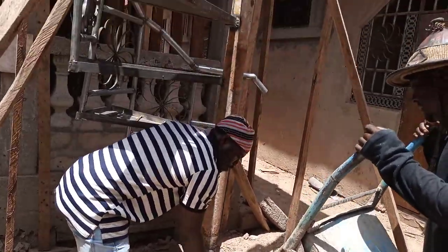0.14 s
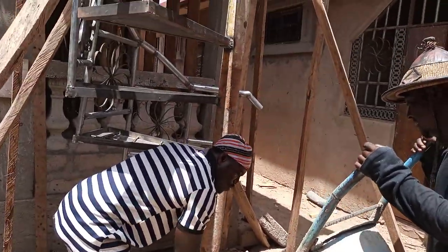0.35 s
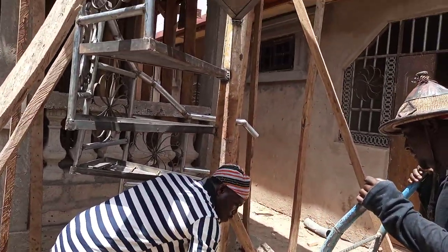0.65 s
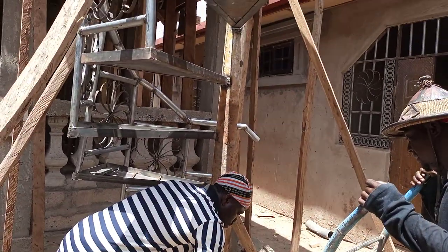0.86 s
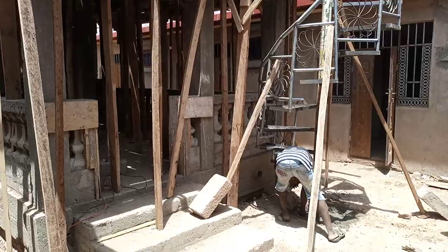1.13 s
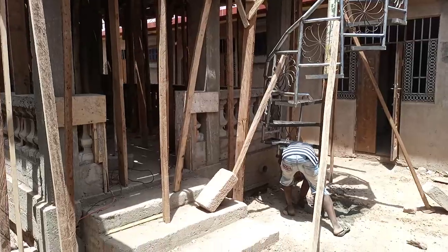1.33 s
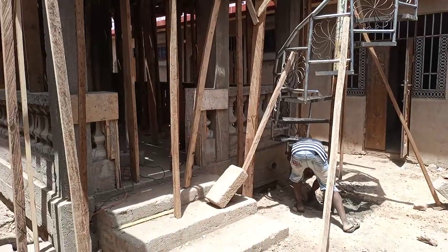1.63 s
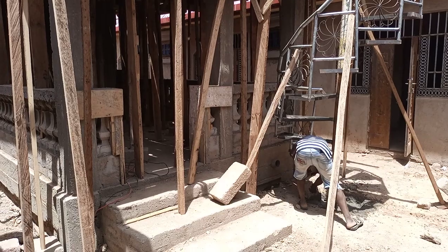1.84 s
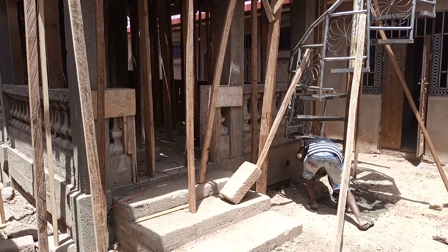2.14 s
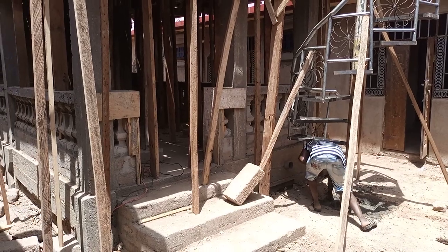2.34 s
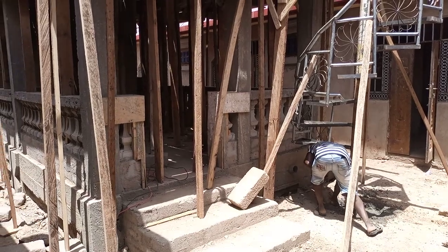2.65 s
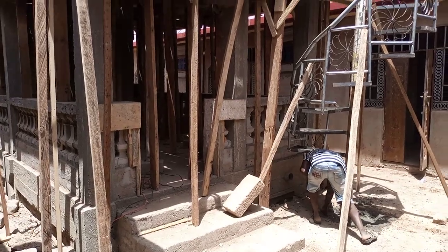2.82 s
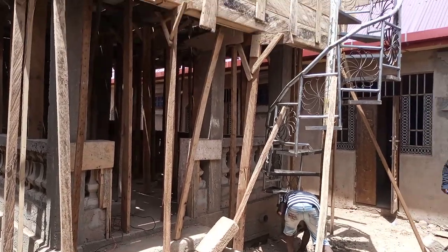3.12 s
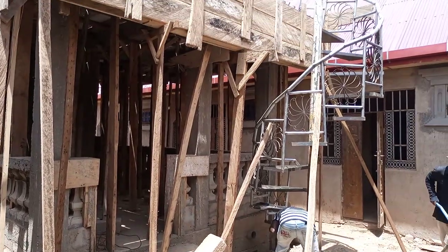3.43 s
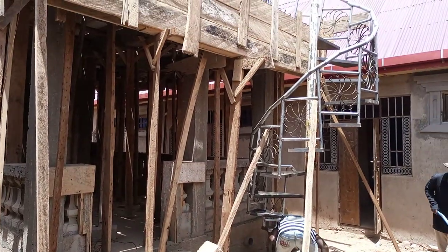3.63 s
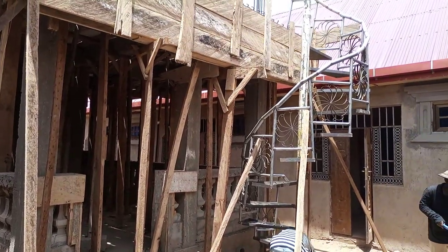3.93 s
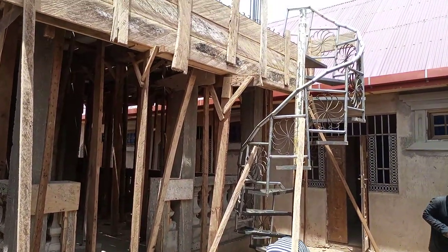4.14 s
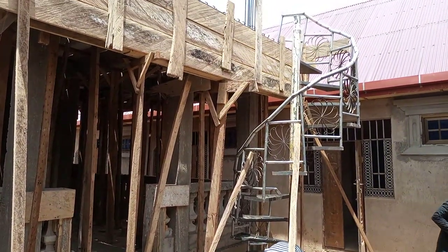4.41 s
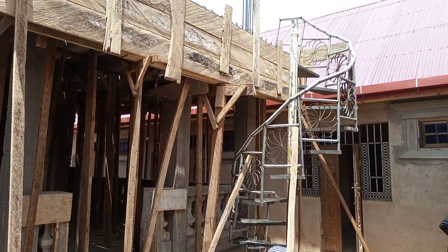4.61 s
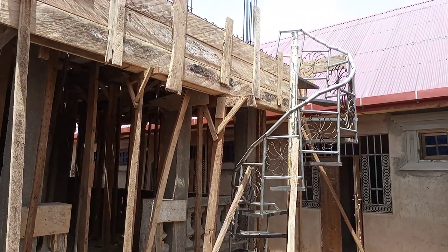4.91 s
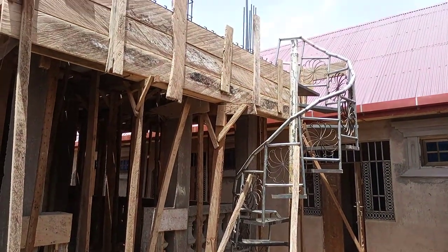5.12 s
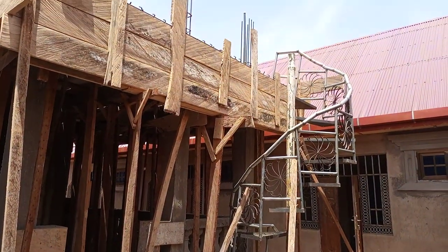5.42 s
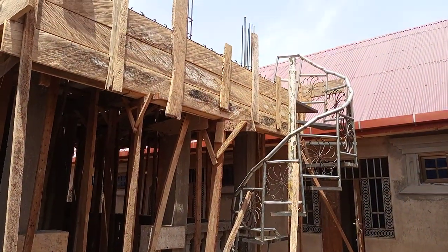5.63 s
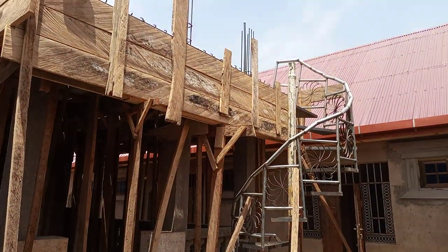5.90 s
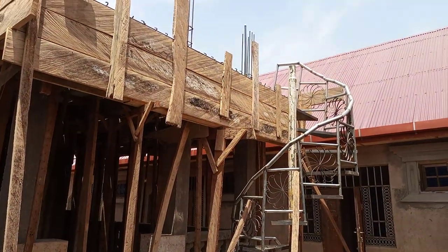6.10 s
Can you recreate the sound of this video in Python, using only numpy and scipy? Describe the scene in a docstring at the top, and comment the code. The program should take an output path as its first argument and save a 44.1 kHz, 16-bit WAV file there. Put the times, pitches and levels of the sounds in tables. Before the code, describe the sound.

A steel shovel scrapes gritty wet concrete from a drumming wheelbarrow close by, drops out briefly, then continues far quieter across a humming yard.

```python
"""On a building site, a steel shovel scrapes wet concrete out of a wheelbarrow tray, first close by.
Gravel grinding under the blade is stone-laden noise shaped into slurry, grit and fizz; the blade rings
in decaying modes when it bites, and noise-driven resonances make the tray drum. After a short dropout
it cuts to across the yard, where a low machine hum wavers over a rumble and soft low throbs swell.
Stones snap, the edge squeals in stacked overtones, and the load groans in sliding narrow bands."""
import sys
import numpy as np
from scipy import signal
from scipy.fft import rfft, irfft, next_fast_len
from scipy.io import wavfile
from scipy.ndimage import uniform_filter1d, map_coordinates

SR = 44100
rng = np.random.default_rng(int(sys.argv[2]) if len(sys.argv) > 2 else 0)


def store_pcm(level_fs):
    """Save levels as 16-bit WAV."""
    pcm = np.round(np.clip(level_fs, -1, 1) * 32767).astype(np.int16)
    wavfile.write(sys.argv[1], SR, np.atleast_2d(pcm).T)


N = 276066
CUT_S = 1.0688  # close before this moment, far after it

# Ringing modes of the steel blade: frequency_hz, level_db (relative), t60_s
BLADE_MODES = [(824, 5, 0.13), (1313, 11, 0.072), (1770, -6, 0.048), (2310, 0, 0.18), (3160, -5, 0.12),
               (3658, 4, 0.15), (4900, -5.5, 0.12), (5540, -3.5, 0.1), (6490, 0, 0.16)]
# Treble colour on the fizz, bites and snaps, a peak near 15 kHz, then a steep drop: frequency_hz, gain_db
TREBLE_COLOUR = [(13600, 0), (14600, 13), (15200, 17), (15780, 17), (15950, -22), (16500, -24),
                 (16750, -45)]


def shovel():
    """Sliding friction radiates from the load; close by, the tray it excites radiates too."""
    close = np.arange(N) < CUT_S * SR
    grit_db, slurry_db, fizz_db = strokes()
    body = scrape(grit_db, slurry_db, fizz_db, steel=0.045)
    return body + close * drumming(grit_db)


def strokes():
    """Energy addition: overlapping strokes sum in power to a grit level, and slurry and fizz against it."""
    # Strokes of the blade through the load: start_s, grit_db, rise_s, hold_s, fade_db_per_s,
    # slurry_db and fizz_db (both relative to the grit)
    stroke_rows = [(0.0, -30.5, 0.0014, 0.08, 150, -10, -2.5), (0.083, -29, 0.039, 0.089, 300, -4, -5),
                   (0.242, -40.5, .005, 0.0092, 75, -1.5, -3), (0.423, -28, 0.0018, 0.1, 148.5, -4, -4.5),
                   (0.513, -26.5, 0.057, 0.049, 159.5, -4.5, -2), (0.772, -32, 0.0036, 0.051, 151, -4, 3.5),
                   (0.846, -27, 0.0064, 0.076, 154, -1.5, -2),
                   (1.035, -24, 0.0025, 0.036, 149.5, -4.5, -3.5),
                   (1.069, -45.5, 0.0034, 0.18, 34, -5.5, -0.5), (1.197, -44.5, 0.21, 0.045, 126, -3, -2),
                   (1.601, -53.5, 0.06, .05, 100, -7, -3), (1.696, -39, 0.018, 0.02, 141, -6, -1),
                   (1.89, -59.5, 0.047, 0.28, 106, -1.5, -9), (2.173, -53.5, .005, .02, 150, -6, -5),
                   (2.224, -46, 0.011, 0.052, 60, -5.5, -4.5), (2.323, -43.5, 0.058, 0.027, 45.5, -3, 4),
                   (2.5, -48, 0.043, 0.019, 83, -6, -4.5), (2.784, -33, .001, 0.013, 60, -4.5, -1),
                   (3.053, -45, .008, 0.064, 143, -8.5, 1.5),
                   (3.213, -36.5, 0.0061, 0.022, 132.5, -5.5, -0.5), (3.272, -49, .02, 0.031, 111, -9, 3.5),
                   (3.626, -57, 0.1, .02, 70, -2.5, -13.5), (3.84, -59, 0.037, 0.067, 80, -0.5, -13.5),
                   (3.984, -37.5, 0.0011, .02, 150, -21, -5.5), (4.008, -40, 0.032, 0.027, 42, -7.5, 4.5),
                   (4.094, -43.5, 0.085, 0.15, 35, -5, -3.5), (4.51, -49.5, .03, 0.045, 37, -2.5, 1),
                   (4.767, -43.5, 0.011, 0.018, 110, -7, -5), (4.853, -50, 0.065, 0.15, 54, -1.5, -0.5),
                   (5.045, -44.5, 0.061, 0.014, 107, -19, 2), (5.208, -48.5, 0.035, .05, 41, -2.5, -1.5),
                   (5.302, -46.5, .005, 0.02, 200, -5, -2), (5.382, -45.5, .005, 0.1, 158, -2.5, 4.5),
                   (5.568, -45, 0.0082, 0.011, 293, -4.5, 10), (5.715, -49, 0.041, .02, 97, 0.5, 4),
                   (5.766, -37.5, 0.058, 0.012, 152, -4, 4), (5.833, -41, 0.021, 0.02, 52, -3.5, 2.5),
                   (6.11, -35.5, .004, 0.022, 100, -6, -9), (6.179, -33.5, .03, 0.036, 150, -8, -1)]
    rest_db = -72.5  # grit trickling between strokes
    slurry_lag_s, slurry_fade, fizz_fade = 0.0071, 0.84, 1.48  # slurry lingers, fizz dies sooner
    grit_levels, slurry_levels, fizz_levels = [rest_db], [rest_db - 2.5], [rest_db - 19.5]
    for s, db, rise, hold, fade, wet_db, fine_db in stroke_rows:
        grit_levels.append(shape(s, db, rise, hold, fade))
        slurry_levels.append(shape(s, db + wet_db, rise + slurry_lag_s, hold, fade * slurry_fade))
        fizz_levels.append(shape(s, db + fine_db, rise, hold, fade * fizz_fade))
    grit = power_sum(grit_levels)
    return grit, power_sum(slurry_levels) - grit, power_sum(fizz_levels) - grit


def scrape(grit_db, slurry_db, fizz_db, steel):
    """Granular friction: low slurry, grit exciting the blade's modes and fine fizz share one judder."""
    # Relative spectra of the three parts of the load: frequency_hz, density_db
    grit_spectrum = [(900, -50), (1800, -1.5), (3000, -2), (6400, 1), (7500, -5), (9000, -15),
                     (11000, -43.5)]
    slurry_spectrum = [(200, -19.5), (400, -7), (640, -4.5), (1200, -6.5), (1900, -10.5), (3000, -50.5)]
    fizz_spectrum = [(6500, -38), (9000, 1), (11400, 0), (13500, -0.5), (17000, -4)]
    judder = amp(1.16 * wobble(30) + 0.6 * wobble(90))
    rub = gravel(1500, spread_db=2.5, share=0.45, patchy_db=2.5, size=512)
    singing = resonant([(hz, 6 / t60, db) for hz, db, t60 in BLADE_MODES])  # shorter ring, wider band
    bare_grit = unit(filtered(rub, colour(grit_spectrum)))
    grit = unit(bare_grit + steel * unit(filtered(rub, singing)))
    wet_load = gravel(600, spread_db=1.0, share=0.33, patchy_db=3.5, size=2048)
    slurry = unit(filtered(wet_load, colour(slurry_spectrum)))
    fizz_response = lambda hz: colour(fizz_spectrum)(hz) * colour(TREBLE_COLOUR)(hz)
    fizz = unit(amp(1.7 * wobble(22)) * filtered(rub, fizz_response))  # fine sand comes in spurts
    return amp(grit_db) * judder * (grit + amp(slurry_db) * slurry + amp(fizz_db) * fizz)


def gravel(rate, spread_db, share, patchy_db, size):
    """Shot noise: uneven stones at a mean rate per second in sand hiss, its colour shifting in patches."""
    chance = rng.random(N) < rate / SR
    stones = chance * rng.standard_normal(N) * amp(spread_db * rng.standard_normal(N))
    mixture = rng.standard_normal(N) + share * unit(stones)
    spectrum = signal.stft(mixture, nperseg=size)[2]
    field = rng.standard_normal(spectrum.shape)
    field = uniform_filter1d(field, size=3, axis=0)  # smooth over frequency
    field = uniform_filter1d(field, size=7, axis=1)  # smooth over time
    return signal.istft(spectrum * amp(patchy_db * unit(field)), nperseg=size)[1][:N]


def drumming(grit_db):
    """Forced resonance: gravelly knocks excite the tray's modes, each wavering in level at random."""
    # Modes of the tray: frequency_hz, width_hz, level_db (relative)
    tray_modes = [(200, 16, 1), (236, 18, -4), (285, 18, 7), (372, 18, 3), (410, 12, -4), (575, 24, -5),
                  (805, 24, -9)]
    # Moments when a close stroke digs in: start_s, level_db, hold_s
    dig_rows = [(0.0, -27, 0.059), (0.423, -29, 0.069), (0.773, -24.5, 0.019), (0.848, -23, 0.027)]
    rise_s, fade_db_per_s, under_grit_db = 0.0065, 167, -7
    levels = [grit_db + under_grit_db]
    levels += [shape(s, db, rise_s, hold, fade_db_per_s) for s, db, hold in dig_rows]
    knocks = gravel(470, spread_db=2.0, share=0.36, patchy_db=-0.5, size=1024)
    modes = sum(amp(2.5 * wobble(8.89)) * filtered(knocks, resonant([mode])) for mode in tray_modes)
    thin_sheet = lambda f: 1 / (1 + (140 / (f + 1)) ** 4)  # a small panel radiates no deep bass
    return amp(power_sum(levels)) * unit(filtered(modes, thin_sheet))


def bites():
    """Impact excitation: a bite rings the blade's modes and throws grit, brighter for a harder edge."""
    # Bites of the blade: start_s, level_db (before colouring), ring_db (relative),
    # brightness_db_per_octave (about 4 kHz)
    bite_rows = [(0.4235, -2, -21.5, -1.5), (0.847, -14.5, -17, 5), (2.2228, -29, -17, 6),
                 (2.365, -22, -14.5, 2.5), (2.78, -8, -16, 1), (2.8335, -19.5, -15, 5.5),
                 (3.0673, -26, -14, -1.5), (3.9799, -15.5, -17, 2), (4.0194, -21.5, -16, -1.5),
                 (4.0794, -22.5, -23, 6), (5.295, -22, -23, 0.5), (5.571, -26.5, -13, -1),
                 (5.7493, -24.5, -12, 3.5), (5.7677, -19.5, -17.5, -3), (5.8015, -13, -14.5, 1.5),
                 (6.1016, -17, -9, 1)]
    out, t = np.zeros(N + SR), np.arange(SR // 4) / SR
    octaves = np.log2(np.clip(np.fft.rfftfreq(len(t), 1 / SR), 400, 12000) / 4000)
    onset = 1 - np.exp(-t / 0.0017)
    for s, db, ring_db, bright_db in bite_rows:
        ring = 0
        for hz, level, t60 in BLADE_MODES:
            mode_db = level + bright_db * np.log2(hz / 4000) + rng.normal(0, 1.4)  # new strengths each bite
            ring = ring + amp(mode_db - 60 * t / t60) * np.sin(2 * np.pi * hz * t)
        grit = irfft(rfft(rng.standard_normal(len(t))) * amp(bright_db * octaves), len(t))
        puff = amp(-6 - 60 * t / 0.083) * grit
        out[round(s * SR):][:len(t)] += amp(db) * (amp(ring_db) * ring * onset + puff)
    return filtered(out[:N], colour([(300, -25.5), (3000, -11.0), (7000, -4.5), (13500, -17)]))


def snaps():
    """Brittle fracture: a cracking stone is a few milliseconds of decaying bright noise."""
    # Single stones snapping under the edge: start_s, level_db (before decay and colouring)
    snap_rows = [(0.0118, -5.5), (0.0897, -6.5), (0.5557, -7), (4.5171, -33), (4.641, -26.5), (5.3983, -27),
                 (5.4265, -21), (5.707, -34), (5.893, -16), (6.196, -12.5)]
    out, t = np.zeros(N + SR), np.arange(SR // 50) / SR
    for s, db in snap_rows:
        crack = unit(rng.standard_normal(len(t)))
        out[round(s * SR):][:len(t)] += amp(db - 3 - 60 * t / .014) * crack
    return filtered(out[:N], colour([(2000, -22.5), (5000, -3.0), (8000, -6), (13500, -14)]))


def squeals():
    """Stick-slip: regular slips give harmonic overtones, each stuttering as stones pass under the edge."""
    # Squeals of the edge slipping on steel: start_s, slip_rate_hz, level_db (before overtone gains), t60_s
    squeal_rows = [(2.781, 624, -34, .3), (6.103, 628, -32.5, .45)]
    # Strength of the overtones: frequency_hz, gain_db
    overtone_gains = [(600, -12), (1250, -2), (2500, -3.5), (3100, -12), (3770, 0), (4400, -17),
                      (5300, -16), (8000, -4)]
    out, t = np.zeros(N + SR), np.arange(SR // 3) / SR
    onset = 1 - np.exp(-t / 0.0075)
    for s, hz, db, t60 in squeal_rows:
        stack = 0
        for k in range(1, 13):
            stutter = amp(2.5 * wobble(70)[:len(t)])
            tone = np.sin(2 * np.pi * (k * hz * t + rng.random()))
            stack = stack + colour(overtone_gains)(k * hz) * stutter * tone
        out[round(s * SR):][:len(t)] += amp(db - 60 * t / t60) * onset * stack
    return out[:N]


def groans():
    """Narrow-band noise: random quadrature modulation of a carrier that slides as the load shifts."""
    # Groans of the load: start_s, length_s, from_hz, to_hz, level_db
    groan_rows = [(0.089, .14, 882, 1308, -34.5), (2.371, 0.24, 917, 683, -52),
                  (2.44, 0.097, 1490, 1380, -52), (3.65, 0.15, 1400, 1240, -68),
                  (6.171, 0.067, 463, 430, -39.5)]
    flutter = 85  # random knots per second
    out, t = 0, np.arange(N) / SR
    for s, length, from_hz, to_hz, db in groan_rows:
        progress = np.clip((t - s) / length, 0, 1)
        phase = 2 * np.pi * np.cumsum(from_hz + (to_hz - from_hz) * progress) / SR
        band = wobble(flutter) * np.sin(phase) + wobble(flutter) * np.cos(phase)
        swell = np.sqrt(np.abs(np.sin(np.pi * progress))) * (progress < 1)
        out = out + amp(db) * swell * band
    return out


def yard():
    """Random modulation: the far hum wavers in pitch and is fuzzy; lumpy noise rumbles near and far."""
    # Level of the hum: time_s, level_db
    hum_levels = [(1.09, -53), (1.15, -64.5), (1.45, -59), (1.66, -86), (1.72, -52.5), (2.28, -66.5),
                  (2.34, -53), (2.57, -65), (2.62, -58.5), (3.42, -74), (3.535, -67), (3.555, -57),
                  (3.6, -67), (3.64, -54), (4.2, -53), (4.3, -57), (4.88, -57), (5.02, -46), (5.21, -58),
                  (5.49, -50), (5.63, -61.5), (6.26, -54)]
    # Mean pitch of the hum: time_s, pitch_hz
    hum_pitches = [(3.65, 191.1), (3.78, 180.6), (4.0, 196.2), (4.3, 186.5), (5.0, 180), (5.5, 192.7)]
    # Relative spectrum of the rumble: frequency_hz, density_db
    rumble_spectrum = [(18, -51.5), (56, -30), (67, -5.5), (79, -9), (125, 5), (160, -1), (290, 5),
                       (400, -33.5)]
    rumble_re_hum_db, close_rumble_db = -3.5, -61
    waver_hz = 3  # typical random deviation
    hum_db, = curves(hum_levels)
    pitch_hz, = curves(hum_pitches)
    far = np.arange(N) > CUT_S * SR
    phase = 2 * np.pi * np.cumsum(pitch_hz + waver_hz * wobble(6)) / SR
    fuzzy = (.7 + wobble(32)) * np.sin(phase) + wobble(32) * np.cos(phase)
    hum = amp(hum_db) * unit(fuzzy) * far
    rumble_db = np.where(far, hum_db + rumble_re_hum_db, close_rumble_db)
    noise = filtered(rng.standard_normal(N), colour(rumble_spectrum))
    return hum + amp(rumble_db) * unit(amp(1.2 * wobble(11)) * noise)


def throbs():
    """Amplitude modulation: each soft low pure tone swells and vanishes under a half-cosine."""
    # Throbs: middle_s, length_s, pitch_hz, level_db (rms at the middle)
    throb_rows = [(1.252, .12, 67.7, -62), (2.495, .1, 70.7, -61.5), (3.56, 0.11, 68, -65),
                  (3.71, 0.1, 69, -59.5), (3.84, .09, 68.5, -61), (4.03, .1, 68.8, -65),
                  (4.95, 0.09, 68, -63), (6.174, 0.13, 66.8, -59.5)]
    out, t = 0, np.arange(N) / SR
    for s, length, hz, db in throb_rows:
        swell = np.cos(np.pi * np.clip((t - s) / length, -.5, .5))
        out = out + amp(db + 3) * swell * np.sin(2 * np.pi * (hz * t + rng.random()))
    return out


def shape(s, db, rise, hold, fade):
    """Exponential envelope, linear in dB: rise, hold, fade; the cut ends whatever began before it."""
    t = np.arange(N) / SR
    start_db = -5.5 - 43.5 * rise  # relative to the full level: a slower rise starts softer
    to_rise = np.clip(1 - (t - s) / max(rise, 1 / SR), 0, 1)
    fading_s = np.clip(t - s - rise - hold, 0, None)
    level = db + start_db * to_rise - fade * fading_s
    return np.where((t >= s) & ((t < CUT_S) | (s >= CUT_S)), level, -150)


def power_sum(levels_db):
    """Incoherent addition: the level of unrelated sounds heard together."""
    return 10 * np.log10(sum(amp(2 * db) for db in levels_db))


def amp(db):
    """Logarithmic level: decibels to amplitude gain."""
    return 10 ** (np.asarray(db) / 20)


def unit(x):
    """Normalisation to a root-mean-square value of 1."""
    return x / np.sqrt(np.mean(x ** 2) + 1e-20)


def curves(rows):
    """Linear interpolation: one value per sample for each column after the time."""
    s, *cols = np.transpose(rows)
    return [np.interp(np.arange(N) / SR, s, c) for c in cols]


def wobble(rate):
    """Band-limited randomness: a smooth curve through rate random knots per second."""
    knots = rng.standard_normal(int(N * rate / SR) + 4)
    return map_coordinates(knots, [np.arange(N) * rate / SR])


def filtered(x, response):
    """Linear filtering: the spectrum of x times a complex response of frequency."""
    m = next_fast_len(N + SR // 2)
    return irfft(rfft(x, m) * response(np.fft.rfftfreq(m, 1 / SR)), m)[..., :N]


def colour(points):
    """Spectral envelope: gain from (Hz, dB) points joined on a log-frequency axis."""
    f, db = np.transpose(points)
    return lambda hz: amp(np.interp(np.log(hz + 1), np.log(f), db))


def resonant(modes):
    """Modal superposition: causal response of (Hz, width Hz, dB) resonances of alternating sign."""
    def response(f):
        total = 0
        for k, (centre, width, db) in enumerate(modes):
            damping = 1j * f * width
            total = total + (-1) ** k * amp(db) * damping / (centre * centre - f * f + damping)
        return total
    return response


def scene():
    """Superposition: all sources add in one channel, bites and snaps through the treble colour."""
    impacts = filtered(bites() + snaps(), colour(TREBLE_COLOUR))
    return (shovel() + impacts + squeals() + groans() + yard() + throbs())[None]


def record(dry):
    """Gating and band limiting: the sound drops out briefly and nothing passes above the limit."""
    dropout_start_s, dropout_end_s, top_hz = .9185, 1.0362, 17100
    t = np.arange(N) / SR
    on = (t < dropout_start_s) | (t > dropout_end_s)
    gate = uniform_filter1d(on * 1., size=40)  # soft edges
    return filtered(dry * gate, lambda hz: hz < top_hz)


dry = scene()
out = record(dry)
store_pcm(out)
```